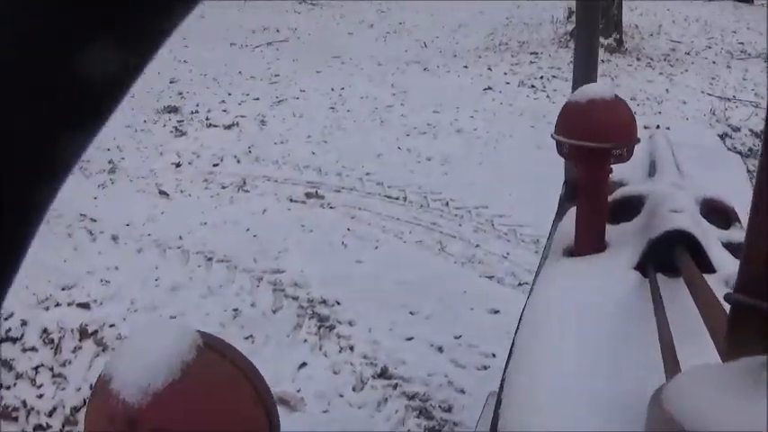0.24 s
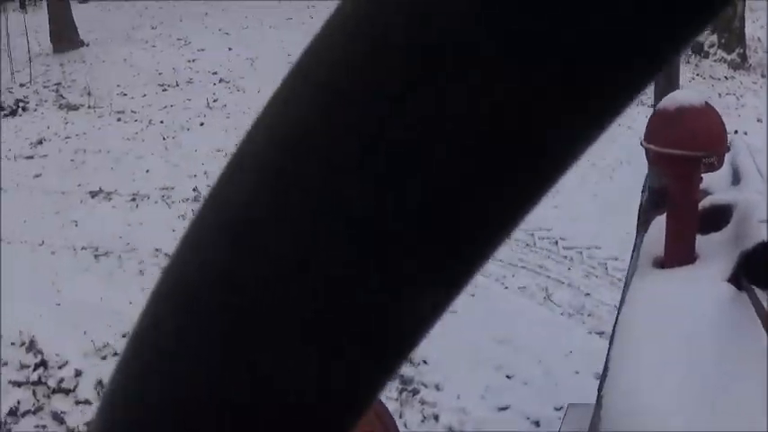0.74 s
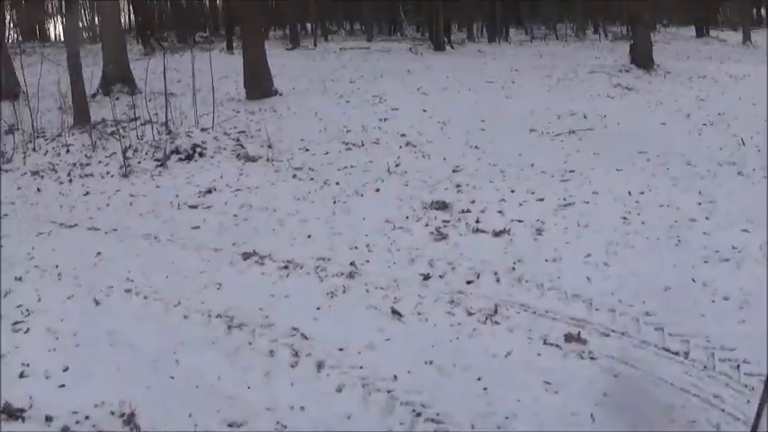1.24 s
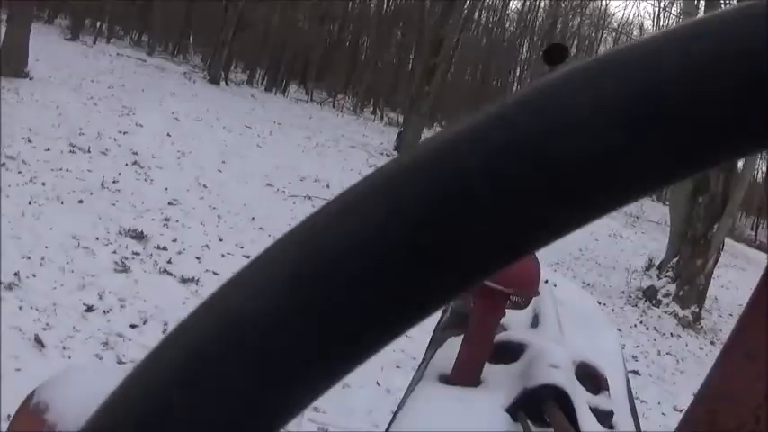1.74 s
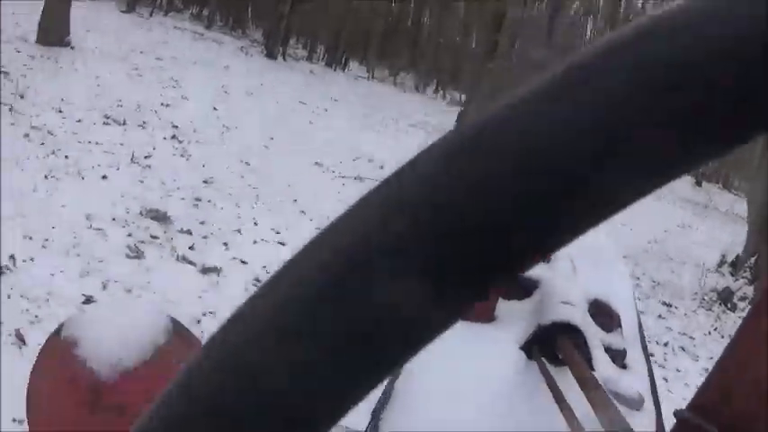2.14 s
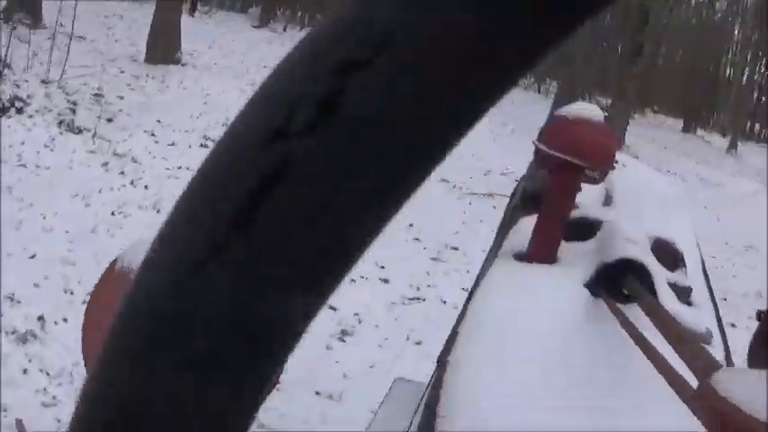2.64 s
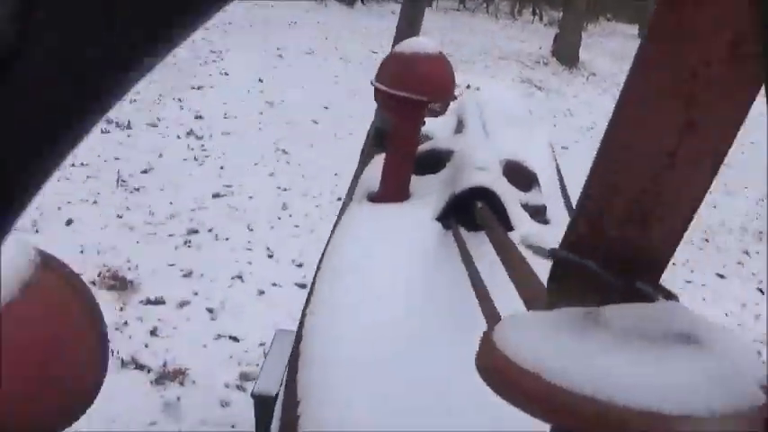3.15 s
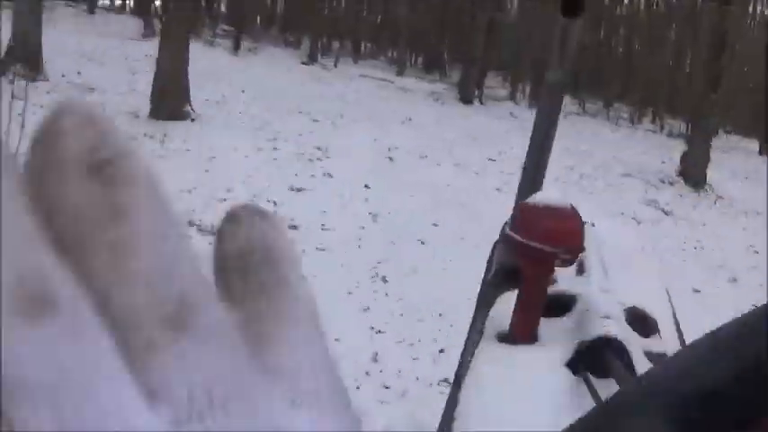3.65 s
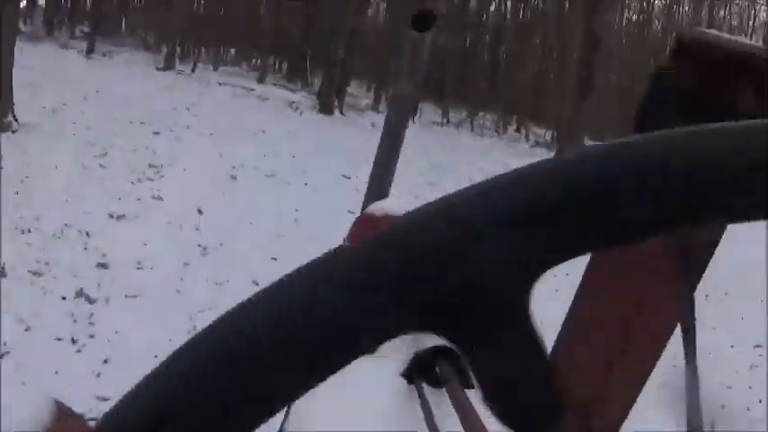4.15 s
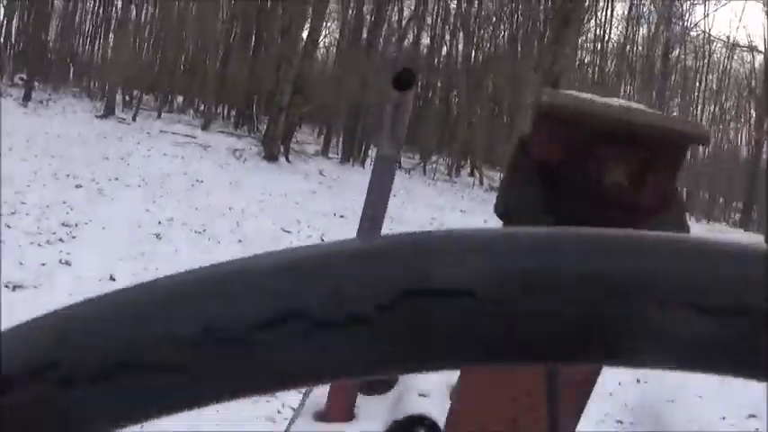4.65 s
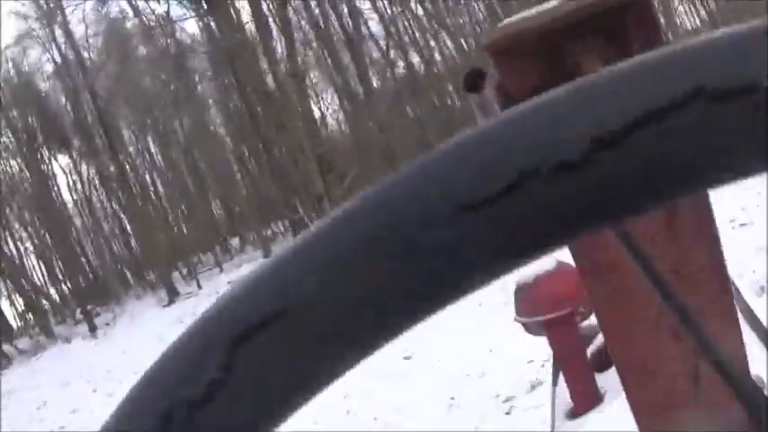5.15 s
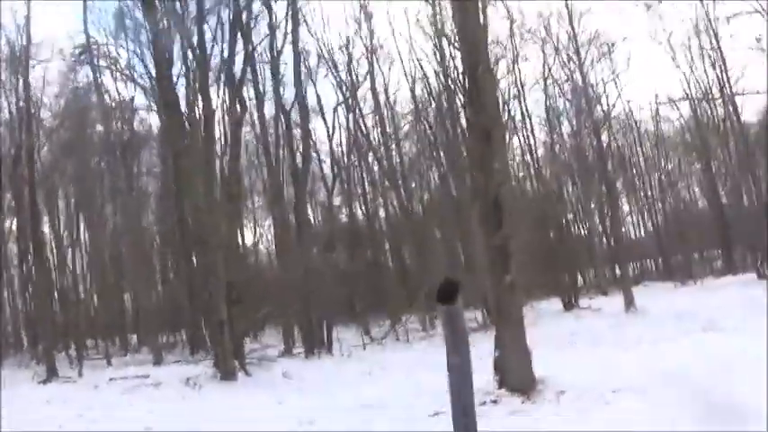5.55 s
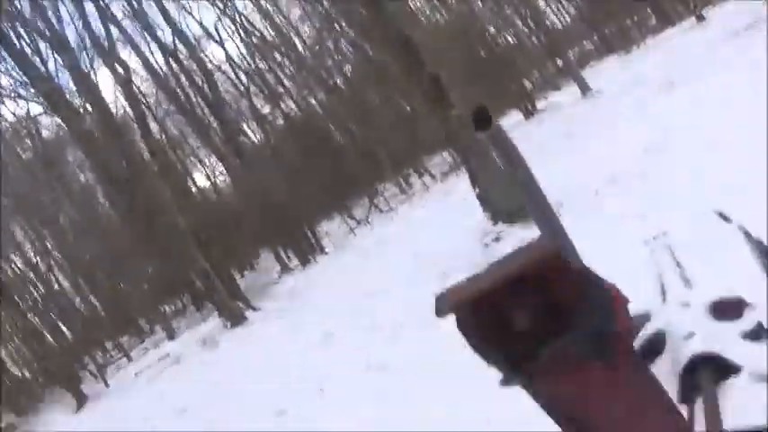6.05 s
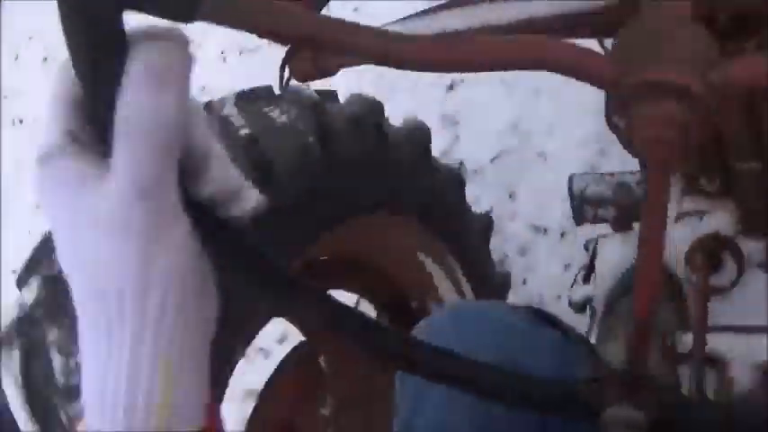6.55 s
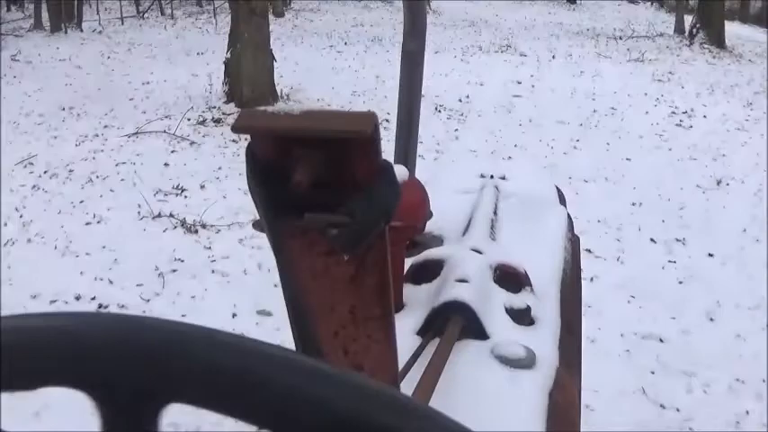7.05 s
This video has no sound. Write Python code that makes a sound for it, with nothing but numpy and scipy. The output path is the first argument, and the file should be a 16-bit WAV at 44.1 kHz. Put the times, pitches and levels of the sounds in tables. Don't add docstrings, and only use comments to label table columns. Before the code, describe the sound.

An old four-cylinder tractor engine climbs from rough idle, surges and falls twice, then settles into a steady, loud, raspy open-stack exhaust beat.

```python
import sys
import numpy as np
from scipy import signal
from scipy.fft import rfft, irfft, next_fast_len
from scipy.io import wavfile
from scipy.ndimage import uniform_filter1d

SR = 44100
rng = np.random.default_rng(int(sys.argv[2]) if len(sys.argv) > 2 else 0)


def invert_db(x):
    u = np.asarray(x, float) / 20
    return 10 ** u


def to_wav(s):
    ch = np.atleast_2d(s).T
    pcm = np.round(np.clip(ch, -1, 1) * 32767)
    wavfile.write(sys.argv[1], SR, pcm.astype(np.int16))


N = 321930
TIME = np.arange(N) / SR


def curves(rows):
    s, *columns = np.transpose(rows)
    return [np.interp(TIME, s, c) for c in columns]


def levelled(x, size=6000):
    power = uniform_filter1d(uniform_filter1d((x ** 2).mean(0), size), size)
    return x / np.sqrt(abs(power) + 1e-12)


def coloured(x, points):
    hz, db = np.transpose(points)
    grid = abs(np.fft.fftfreq(8192, 1 / SR)) + 1
    gain_db = np.interp(np.log(grid), np.log(hz), db)
    log_gain = np.log(invert_db(np.maximum(gain_db, -100)))
    taps = np.fft.ifft(np.exp(np.conj(signal.hilbert(log_gain)))).real[:4096]
    return signal.oaconvolve(x, taps[None], axes=1)[:, :N]


def noise_pair(same):
    shared, left, right = rng.standard_normal((3, N))
    same = np.clip(same, 0, 1)
    return np.sqrt(same) * shared + np.sqrt(1 - same) * np.array([left, right])


def resonate(x, hz, width):
    turn = np.exp(2j * np.pi * np.cumsum(hz) / SR)
    r = np.exp(-np.pi * width / SR)
    smooth = signal.lfilter([1 - r], [1, -r], x / turn + 1e-18)
    return 2 * (turn * smooth).real


# (t/s, facing 0 left, 1 ahead, 2 down)
FACING = [(0, 0), (1.1, 0), (1.5, 1), (2.3, 1), (2.42, 1.8), (2.75, 1.8), (2.88, 1), (6.08, 1), (6.3, 2),
          (6.68, 2), (6.9, 1.45), (7.3, 1.3)]
SHADE_DB = 9


def shade():
    facing, = curves(FACING)
    return invert_db(-SHADE_DB * np.clip(facing - 1, 0, 1) ** 2)


# (t/s, firing rate/Hz)
FIRING_RATE = [(0, 31.42), (.236, 32.96), (.595, 32.21), (.833, 35.71), (1.288, 35.51), (1.317, 39.14),
               (1.854, 54), (2.275, 62.96), (2.851, 54.41), (3.226, 60.99), (3.384, 55.39), (3.74, 57.69),
               (4.779, 58.71), (5.239, 56.59), (5.652, 58.37), (5.989, 59.12), (7.3, 58.93)]
FIRST_FIRING = -.2


def crank():
    rate, = curves(FIRING_RATE)
    return rate, np.cumsum(rate) / SR + FIRST_FIRING


ONSET_S = .0035
LUG_RATE_HZ, LUG_WIDTH_HZ, PUFF_LENGTH, LUG_LENGTH = 40.6, 9.9, 0.37, 1


def puffs(peak_ms, sharpness, tail_db, tail_ms, cylinder_db, scatter_db):
    rate, turns = crank()
    turns = turns + ONSET_S * rate
    number = np.floor(turns).astype(int) + 2
    age_ms = turns % 1 / rate * 1000

    idle_firings = np.cumsum(rate < 40)[-1] * 34 / SR
    unevenness = np.where(np.arange(512) < idle_firings, 1.4, 1)
    scatter = scatter_db * unevenness * rng.standard_normal(512)
    strength = invert_db(np.roll(np.resize(cylinder_db, 512), 2) + scatter)

    lugging = np.exp(-((rate - LUG_RATE_HZ) / LUG_WIDTH_HZ) ** 2)
    length = np.clip(PUFF_LENGTH + LUG_LENGTH * lugging, .5, 2)

    def shape(age):
        u = age / peak_ms
        blow = (u * np.exp(1 - u)) ** np.where(u > 1, sharpness / length, sharpness)
        tail = invert_db(tail_db) * np.tanh(u) * np.exp(-age / tail_ms)
        return blow + tail

    newest = strength[number] * shape(age_ms)
    previous = strength[number - 1] * shape(age_ms + 1000 / rate)
    return levelled((newest + previous)[None], size=9000)


def reflections(x):
    level_db, t60_s, size = -3.0, .035, 16000
    decay = invert_db(-60 * np.arange(4096) / SR / t60_s)
    dull = signal.butter(1, [300, 4000], "bandpass", fs=SR, output="sos")
    padded = np.pad(x, ((0, 0), (size, 2 * size)))
    out = np.zeros((2, N + 4 * size))
    for at in range(0, N + size, size):
        shared, left, right = rng.standard_normal((3, len(decay))) * decay / np.linalg.norm(decay)
        taps = signal.sosfilt(dull, 0.5 * shared + 0.32 * np.array([left, right]))
        faded = padded[:, at:at + 2 * size] * np.hanning(2 * size)
        echo = signal.fftconvolve(faded, taps, axes=1)
        out[:, at:at + echo.shape[1]] += echo
    return x + invert_db(level_db) * out[:, size:size + N]


# (f/Hz, width/Hz, level/dB)
RINGS_LEFT = [(352, 42, -3.5), (640, 41, -2), (1260, 93, 2.5), (1880, 230, 4), (2507, 125, 8.5),
              (2620, 26, 7), (2930, 53, -27), (6060, 170, 6.5), (7700, 300, -4)]
RINGS_AHEAD = [(683, 85, -7.5), (1930, 86, -5), (2374, 420, -3.5), (2866, 89, -4), (3170, 580, -6),
               (4160, 710, 1.5), (6590, 1160, -2)]
RINGS_DOWN = [(1930, 100, -2), (2620, 140, 5), (3330, 270, 8.5), (4300, 200, -4), (6300, 360, -6)]
STOOP_S, STOOP_WIDTH_S, STOOP_RISE = 6.55, .15, .08


def tinwork(x):
    facing, = curves(FACING)
    shift = 1 + STOOP_RISE * np.exp(-((TIME - STOOP_S) / STOOP_WIDTH_S) ** 2)
    out = x.copy()
    for direction, rings in enumerate((RINGS_LEFT, RINGS_AHEAD, RINGS_DOWN)):
        share = np.clip(1 - abs(facing - direction), 0, 1)
        first, last = np.flatnonzero(share)[[0, -1]]
        heard = slice(first, last)
        part = (x.mean(0) * share)[heard]
        for hz, width, db in rings:
            out[:, heard] += invert_db(db) * resonate(part, hz * shift[heard], width)
    return out


# (t/s, f/Hz, depth 0-1)
BONNET = [
    (0, 1520, .4),
    (3.6, 1600, .3),
    (5.6, 1160, .8),
    (7.3, 1180, .8),
]


def bonnet(x, width=240):
    hz, depth = curves(BONNET)
    swallowed = np.array([resonate(channel, hz, width) for channel in x])
    return x - depth * swallowed


# (f/Hz, level/dB per Hz)
DRAUGHT = [(2000, -30), (5000, -4), (10000, 0), (13000, -5), (16000, -12)]
DRAUGHT_DB = -48


def draught():
    hiss = levelled(coloured(noise_pair(1.0), DRAUGHT), size=N)
    return invert_db(DRAUGHT_DB) * shade() * hiss


# (multiple of firing rate, idle level/dB, working level/dB)
ORDERS = [(1, -10, -9), (1.75, -36, -45), (2, 4.5, 1), (2.25, -35, -21), (2.88, -32, -12), (3, -3, -5.5),
          (3.25, -19, -26), (4, -1.5, -16.5), (5, -8.5, -22), (5.76, -8.5, -8.5), (6, -25, -19.5),
          (6.25, -15, -37), (6.5, -31, -20), (7, -11, -21.5), (8, -7.5, -34), (10, -13, -20)]
# (t/s, throttle 0-1)
THROTTLE = [(0, 0.6), (.5, 0.47), (1.1, 0.24), (1.26, 0.32), (1.47, 0.97), (2.29, 0.85), (2.38, 0),
            (2.66, 0.34), (2.9, 0.97), (3.21, 0.84), (3.26, 0), (3.4, 0), (3.49, 0.7), (4.6, 0.78),
            (4.85, 0.54), (5.32, .7), (5.47, 0.75), (7.3, 0.71)]
# (t/s, nearness to the block/dB, aim at the stack mouth/dB, left-right/dB)
HAND = [(0, 1.5, 0.5, -4), (.45, 0.5, -0.5, -5), (.8, 0.5, -9.5, -7), (1.25, -2.3, -6, -8),
        (1.6, 0, 2.5, -3.5), (2.3, -1, -4, -6.5), (2.9, -.5, -4.5, -3.5), (3.3, -1.3, 6, 0.2),
        (3.7, -1.5, -0.3, -6), (4.15, -2, 1, 0), (4.9, 2.5, 0.7, -1.5), (5.33, 1.5, 0.5, -.9),
        (5.45, 2.1, 5, -1), (5.8, -0.2, 3.5, -1), (6.15, 2, 0, -2), (6.45, 5.5, -2.5, 0.5),
        (6.75, 3, 0, -1.1), (7.3, 4.5, 0.8, -1)]
THUMP_DB, THUMP_NEAR, THUMP_SHUT_DB = -26.5, 1, 2.5
LOAD_DB, LOAD_KNEE = 22, 0.69


def thump():
    rate, turns = crank()
    working = np.clip((rate - 36) / 14, 0, 1)
    throttle, = curves(THROTTLE)
    load_db = np.clip(LOAD_DB * (throttle - LOAD_KNEE), -14, 3)
    out = np.zeros((2, N))
    for k, idle_db, working_db in ORDERS:
        lead = 8 * np.arctan(45 / (k * rate)) - .44 * k
        waver = [np.interp(TIME, np.arange(200) / 25, w) for w in rng.standard_normal((3, 200))]
        wander = .07 * np.sqrt(k) * waver[0] + .3 * k ** .3 * np.array(waver[1:])
        angle = 2 * np.pi * k * turns + lead + wander
        db = idle_db + (working_db - idle_db) * working
        if k == 1:
            db = db + 0.52 * working * load_db
        flutter_db = 0.93 * (2 - working) * waver[0][::-1]
        out += invert_db(db + flutter_db) * np.cos(angle)
    near_db = curves(HAND)[0]
    level_db = THUMP_DB + THUMP_NEAR * near_db + THUMP_SHUT_DB * working * (1 - throttle)
    return invert_db(level_db) * out * invert_db([[-.6], [.6]])


# (f/Hz, level/dB per Hz)
CLATTER = [(12, -20), (20, -45), (70, -13), (114, -14.5), (185, -9.5), (217, -4), (338, -3), (467, -10),
           (672, -7.5), (1050, -5), (1180, -7), (1880, -13.5), (2500, -16.5), (3250, -53), (5500, -120)]
CLATTER_DB, CLATTER_NEAR, CLATTER_IDLE_DB = -25.5, 1, 4.5


def block():
    struck = rng.random(N) < 140 / SR
    blows = invert_db(1.8 * rng.exponential(1, N).clip(0, 3)) * struck
    ticks = signal.lfilter([1], [1, -np.exp(-1 / (0.012 * SR))], blows)
    swell = 1.0 + .3 * ticks + puffs(2.2, 1.8, -5, 30, [1.2, -.8, .8, -1.2], scatter_db=2.5)
    clatter = levelled(coloured(noise_pair(0.67) * swell, CLATTER), size=N)
    idle = np.clip((50 - crank()[0]) / 14, 0, 1)
    level_db = CLATTER_DB + CLATTER_NEAR * curves(HAND)[0] + CLATTER_IDLE_DB * idle
    return invert_db(level_db) * clatter * invert_db([[-.3], [.3]])


# (upper edge f/Hz, time to peak/ms, sharpness, tail level/dB,
# tail/ms, level/dB of cylinders 1-4)
JET_BANDS = [
    (4120, 2.69, 0.93, -20, 125, 1.0, -2.5, 1.1, -2.3),
    (8250, 3.04, 1.84, -24.5, 108, -1.6, 0.097, 0.41, 0.69),
    (10960, 2.85, 1.23, -24.5, 110, -1.6, 2.5, -1.9, 0.99),
    (20300, 3, 2.7, -45, 14, -.7, 0.86, -1.5, 0.99),
]
# (full-throttle level/dB, loss when shut/dB,
# dB per dB of aim, dB per dB of nearness)
JET_LAW = [
    (-19.5, 4.5, -0.08, 0.52),
    (-18.5, 16.5, 0.02, -0.18),
    (-17.5, 15.5, 0.94, 0.4),
    (-26.5, 19, 1.3, -0.2),
]
# (f/Hz, level/dB per Hz)
JET_COLOUR = [(410, -38), (700, -1.5), (1090, 1), (1250, -2.5), (1480, 3.5), (2050, 0.5), (3280, 3),
              (5400, -5.5), (7590, -8), (9230, 2.5), (11800, -7.5), (16000, -31)]


def stack():
    throttle, = curves(THROTTLE)
    near_db, aim_db, _ = curves(HAND)
    size = next_fast_len(N)
    turbulence = rfft(coloured(noise_pair(0.86), JET_COLOUR), size)
    octaves = np.log2(np.fft.rfftfreq(size, 1 / SR) + 1)
    below, out = 0, 0
    for (edge_hz, *shape), (full_db, shut_db, aim, near) in zip(JET_BANDS, JET_LAW):
        under = .5 - .5 * np.tanh((octaves - np.log2(edge_hz)) / .22)
        band = levelled(irfft(turbulence * (under - below), size)[:, :N], size=N)
        db = full_db - shut_db * (1 - throttle) + aim * aim_db + near * near_db
        hidden = shade() if edge_hz > SR / 3 else 1
        out = out + invert_db(db) * hidden * band * puffs(*shape[:4], shape[4:], scatter_db=1.8)
        below = under
    return out


def pan(share):
    return invert_db(np.outer([.5, -.5], share * curves(HAND)[2]))


def scene():
    near = stack() * pan(0.98) + block() * pan(0.84)
    machine = invert_db(-4.5) * bonnet(reflections(tinwork(near)))
    return machine + thump() * pan(0.72) + draught()


def top_cut(x):
    return signal.sosfilt(signal.butter(12, 16490, fs=SR, output="sos"), x)


def record(dry):
    edge = signal.firwin(511, 15900, window=("kaiser", 9), fs=SR)
    limited = signal.oaconvolve(np.tanh(dry), edge[None], "same")
    return top_cut(limited)


dry = scene()
out = record(dry)
to_wav(out)
```